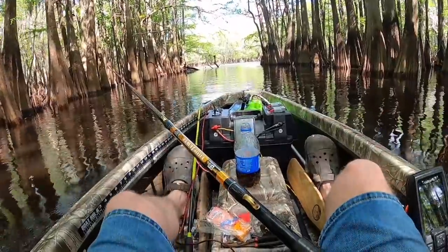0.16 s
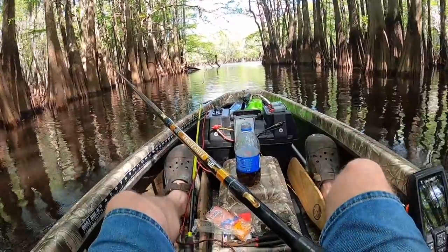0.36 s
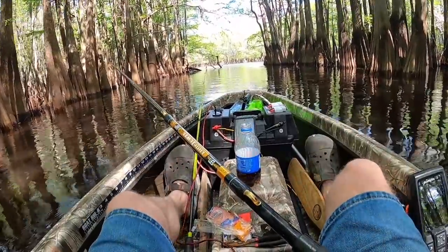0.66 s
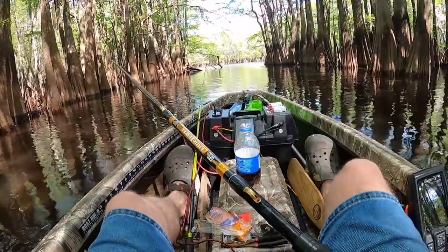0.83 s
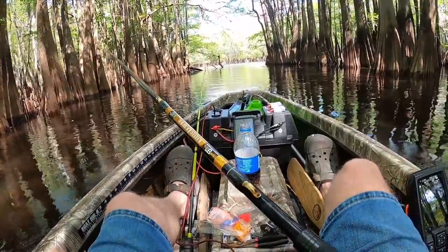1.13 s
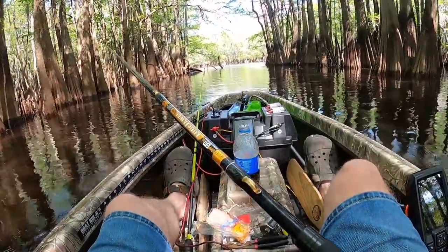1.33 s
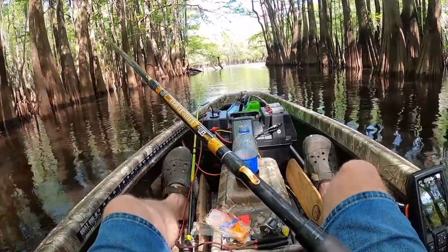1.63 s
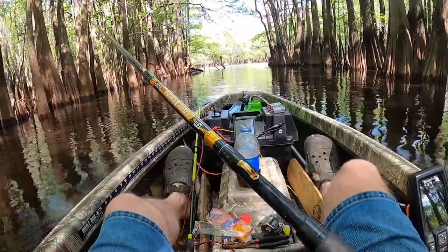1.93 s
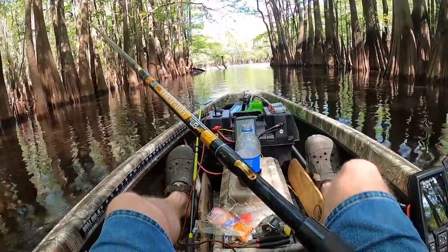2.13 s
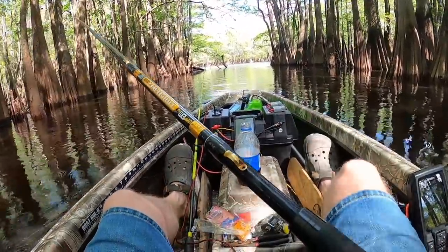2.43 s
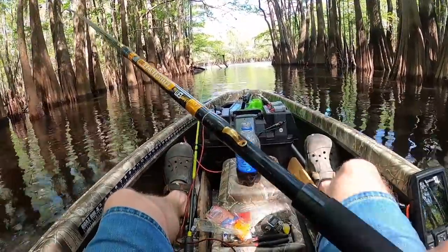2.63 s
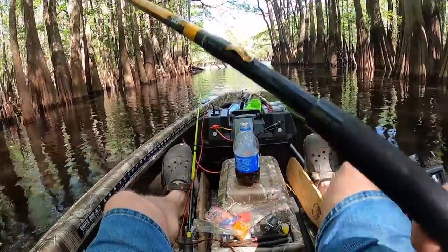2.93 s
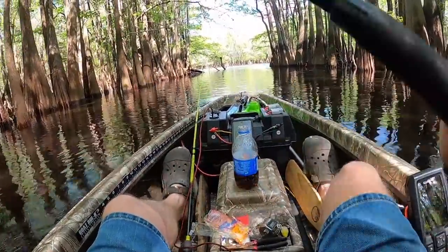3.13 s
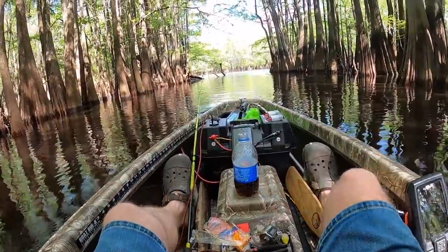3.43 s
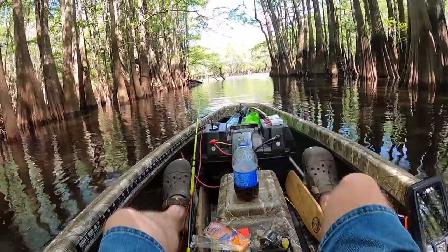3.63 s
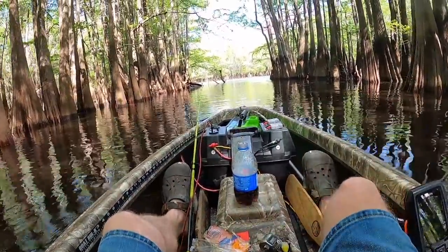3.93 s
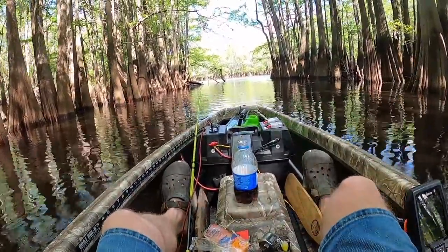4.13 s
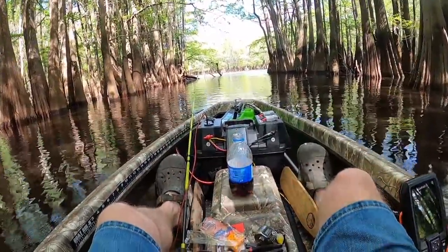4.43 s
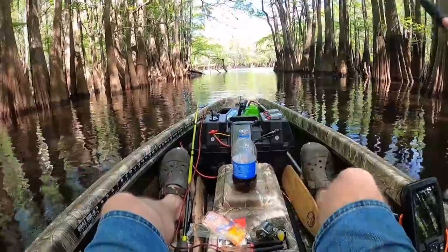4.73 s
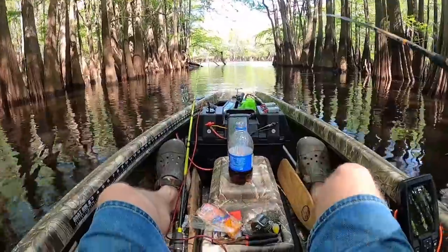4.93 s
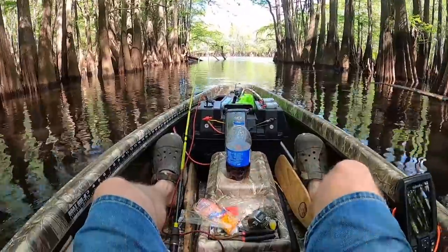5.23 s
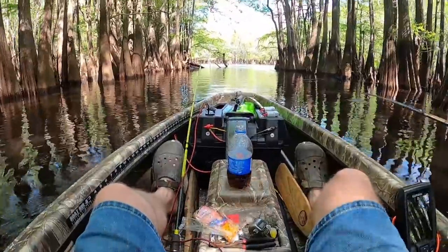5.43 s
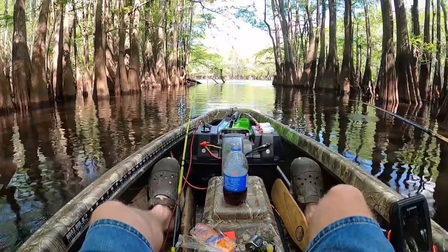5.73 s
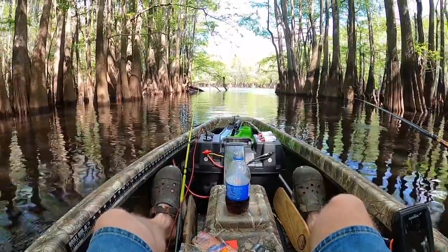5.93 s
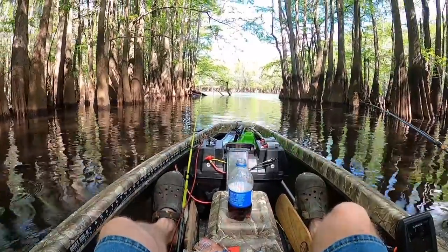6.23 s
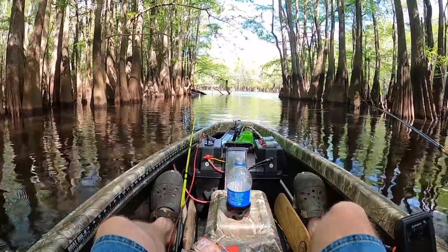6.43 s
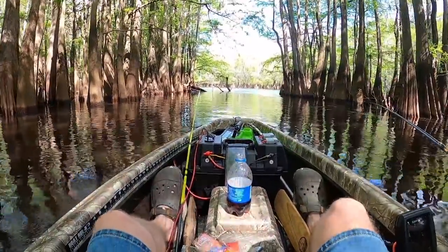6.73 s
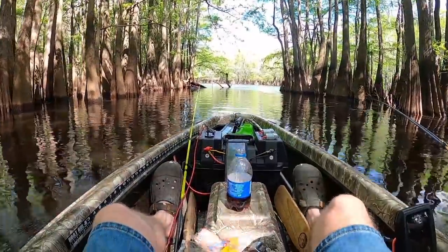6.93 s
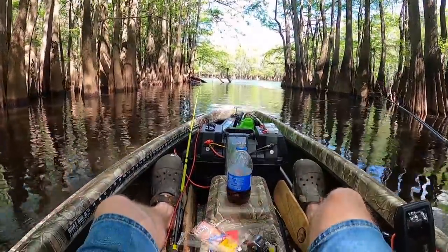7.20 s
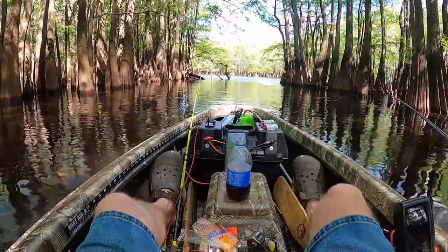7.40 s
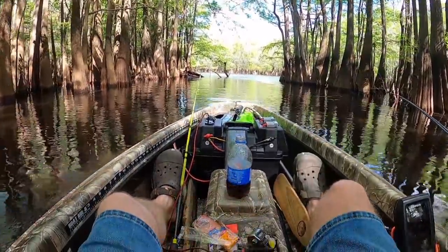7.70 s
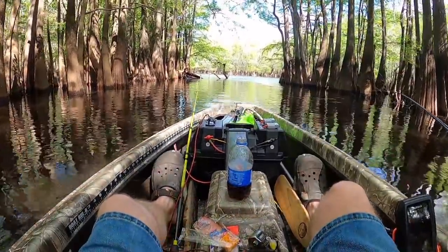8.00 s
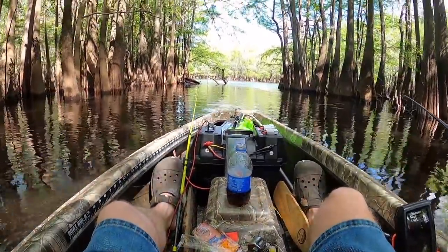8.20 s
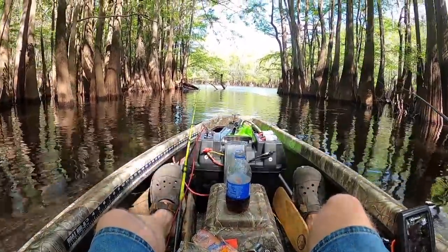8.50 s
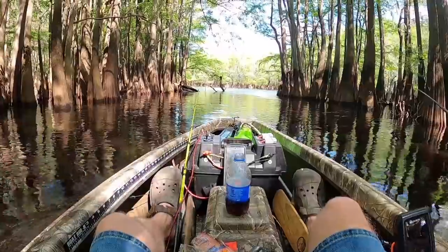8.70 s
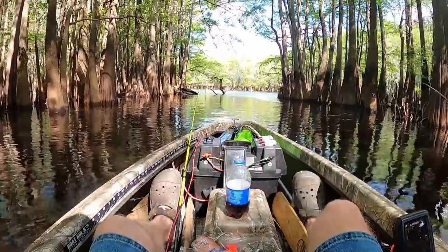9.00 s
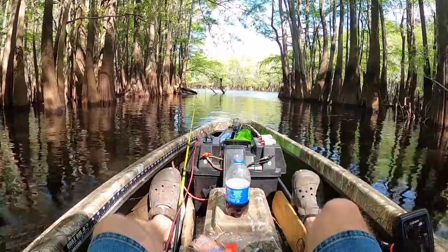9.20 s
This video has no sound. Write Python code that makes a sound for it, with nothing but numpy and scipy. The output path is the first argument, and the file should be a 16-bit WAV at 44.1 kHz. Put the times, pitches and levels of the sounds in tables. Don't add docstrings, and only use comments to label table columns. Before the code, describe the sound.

Aboard a small boat among flooded trees, a low uneven motor hum and soft wind buffeting run throughout. Hull thumps and a dry creak open, then rod scrapes, a sharp clip snap and knocks fill the first three seconds. A near bird gives bright chips in twos and threes about once a second. Far birds whistle, sweep and trill with woody echoes; another knock lands at seven seconds. Close stereo microphone on the boat.

```python
import sys
import numpy as np
from scipy import signal
from scipy.fft import rfft, irfft, next_fast_len
from scipy.io import wavfile
from scipy.ndimage import uniform_filter1d

SR = 44100
rng = np.random.default_rng(int(sys.argv[2]) if len(sys.argv) > 2 else 0)


def magnitude_from_level(level_db):
    exponent = np.asarray(level_db, float) / 20
    return 10 ** exponent


def put_to_file(sound):
    columns = np.atleast_2d(sound).T
    safe = np.clip(columns, -1, 1)
    whole_steps = np.round(safe * 32767)
    wavfile.write(sys.argv[1], SR, whole_steps.astype(np.int16))


N = 412335
T = np.arange(N) / SR

# time_s, shake_db, load (0 to 1)
MOTOR_COURSE = [(.13, -42, 0.18), (.6, -42.5, .2), (1.05, -43, 0.), (1.7, -54, 0.5), (2.3, -44.5, 0.68),
                (3.31, -36.5, 0.63), (3.7, -40.5, 0.86), (4.25, -39, 0.87), (4.5, -46, 0.96),
                (5.6, -38.5, 0.85), (6.3, -47, 0.67), (6.6, -53.5, .4), (7.1, -45.5, 0.44), (7.45, -50, .3),
                (7.66, -43, 0.15), (8.5, -48, 0.26), (9.05, -40, .95), (9.35, -38.5, 0.87)]
# time_s, effort_db, brightness_db
RUB_COURSE = [(0.1, -65.5, -7), (0.55, -71.5, -9.5), (1.3, -65, -13), (2.05, -68, -12.5), (2.65, -65, -6.5),
              (3.25, -72, -10.5), (4.3, -73.5, -9), (5.05, -69, -2), (5.4, -72.5, -5.5), (5.75, -66, -12),
              (6.4, -65.5, -13.5), (6.6, -74, -10), (6.72, -62.5, -17), (7.05, -60.5, -14),
              (7.3, -71.5, -8.5), (8.35, -73, -11), (8.68, -63, -15), (8.8, -70.5, -10)]
# pitch_hz, level_db
COARSE_COLOUR = [(400, 3), (700, -1), (1300, 2.5), (1500, -0.5), (1800, -2), (2400, -6), (3200, -21)]
MIDDLE_COLOUR = [(2000, -7.5), (2800, 2), (4000, -1.5), (5500, -2.5), (7500, -16.5)]
FINE_COLOUR = [(5000, -2.5), (7000, -2.5), (9500, -4.5), (11000, -18), (13000, -13.5), (15500, -30)]
# time_s, pitch_ratio (to the event's pitch), level_db
THIN_NOTE = [(0, 1.01, -14), (.005, 1.004, 0), (.017, 1, -2), (.026, .997, -25)]


def rms1(x):
    return x / np.sqrt(np.mean(x ** 2))


def colour(x, shape):
    hz, db = np.transpose(shape)
    size = x.shape[-1]
    f = np.maximum(np.arange(size // 2 + 1) * SR / size, 1)
    gain_db = np.interp(np.log(f), np.log(hz), db, left=-120, right=-120)
    return irfft(rfft(x) * magnitude_from_level(gain_db), size)


def hiss(shape, alike):
    noise = rng.standard_normal((2, next_fast_len(N, real=True)))
    mid, side = colour(noise, shape)[:, :N]
    alike = np.clip(alike, 0, 1)
    opposite = np.array([[1], [-1]])
    return rms1(np.sqrt(1 + alike) * mid + np.sqrt(1 - alike) * side * opposite)


def walk(rate):
    k = int(SR / rate)
    steps = np.repeat(rng.standard_normal(N // k + 1), k)[:N]
    return rms1(uniform_filter1d(steps, k))


def curve(table):
    s, *cols = np.transpose(table)
    return [np.interp(T, s, c) for c in cols]


def add(bus, s, x):
    i = max(int(s * SR), 0)
    bus[..., i:i + x.shape[-1]] += x[..., :bus.shape[-1] - i]


def sides(pan_db):
    return magnitude_from_level(np.array([[pan_db], [-pan_db]]) / 2)


def ring(x, hz, width):
    peak = signal.iirpeak(hz, hz / width, fs=SR)
    once = signal.lfilter(*peak, x)
    return rms1(signal.lfilter(*peak, once))


def note(shape, ratio=1., octave_db=-61.0):
    s, hz, db = np.transpose(shape)
    t = np.arange(s[0], s[-1], 1 / SR)
    pitch = np.interp(t, s, hz * ratio)
    phase = 2 * np.pi * np.cumsum(uniform_filter1d(pitch, size=60)) / SR
    opens = np.clip((5300 - pitch) / 250, 0, 1) * np.interp(t, s, magnitude_from_level(db - db.max()))
    overtones = magnitude_from_level(octave_db) * opens * (np.sin(2 * phase) + 0.25 * np.sin(3 * phase))
    return np.interp(t, s, magnitude_from_level(db)) * (np.sin(phase) + overtones)


def trunks(x, t60, alike=.6):
    t = np.arange(SR // 2) / SR
    n = rng.standard_normal((3, SR // 2))
    fade = np.exp(-np.log(1000) * t / t60) * np.minimum(t / 0.0045, 1)
    tail = (alike * n[0] + (1 - alike) * n[1:]) * fade
    tail = tail / np.sqrt(np.sum(tail ** 2) / 2)
    return signal.oaconvolve(x[None], tail, axes=1)[:, :N]


def afar(bus, wet_db, t60, pan_db, flutter_db, shimmer_db=0.):
    air = walk(70)
    voice = bus * magnitude_from_level(flutter_db * air)
    tail = magnitude_from_level(wet_db + shimmer_db * air[::-1]) * trunks(voice, t60)
    return (voice + tail) * sides(pan_db)


def song(events, shape, wet_db, t60, pan_db, flutter_db=6.0):
    bus = np.zeros(N)
    for s, *hz, db in events:
        add(bus, s, magnitude_from_level(db) * note(shape, hz[0] if hz else 1.))
    return afar(bus, wet_db, t60, pan_db, flutter_db)


def mode(hz, width):
    wander = np.cumsum(rng.standard_normal(N)) * np.sqrt(2 * np.pi * width / SR)
    phase = 2 * np.pi * hz * T + uniform_filter1d(wander, size=1500)
    return np.sqrt(2) * magnitude_from_level(2.3 * walk(6)) * np.sin(phase)


def hum():
    # pitch_hz, width_hz, unloaded_db, gained_under_load_db
    hull_modes = [(53.05, 3.1, 0, -9), (73.05, 4.25, -4, 1), (106.9, 9.98, -14.5, 8)]
    # pitch_hz, width_hz, relative_db
    hull_overtones = [(148, 11, -11.5), (197.6, 7.6, -12), (234.5, 5.02, -7)]
    shake_db, load = curve(MOTOR_COURSE)
    gains = [magnitude_from_level(shake_db + db + load_db * load) for _, _, db, load_db in hull_modes]
    out = sum(g * mode(hz, w) for g, (hz, w, *_) in zip(gains, hull_modes))
    out = out + gains[2] * sum(magnitude_from_level(db) * mode(hz, w) for hz, w, db in hull_overtones)
    return magnitude_from_level(-1.0) * np.array([np.roll(out, shift=45), out]) * sides(1.3)


def wind():
    # peak_s, peak_db, fall_s (time to fall 20 dB)
    gusts = [(.2, -37, 0.24), (1.1, -52, 0.2), (2.95, -39, 0.72), (5.3, -40, 0.3), (6.01, -37, 0.15),
             (6.33, -49.5, 0.56), (6.9, -46, 0.4), (7.8, -36, 0.38), (8.31, -54, 0.1), (9.2, -45, .5)]
    # pitch_hz, level_db (per Hz)
    buffet_colour = [(10, -10), (25, -3.5), (40, 4.5), (60, -8.5), (100, -15), (160, -24)]
    # pitch_hz, level_db
    rumble_colour = [(40, -10.5), (90, 0.5), (150, -2), (250, -11), (400, -21), (700, -34.5), (1200, -40)]
    gust_level = sum(magnitude_from_level(db - 20 * np.abs(T - s) / fall) for s, db, fall in gusts)
    effort_db, load = curve(RUB_COURSE)[0], curve(MOTOR_COURSE)[1]
    rumble_level = magnitude_from_level(-59.5 + 7 * load + .45 * (effort_db - effort_db.min()))
    buffet = magnitude_from_level(2.5 + 1.5 * walk(7)) * gust_level * hiss(buffet_colour, 0.11)
    rumble = magnitude_from_level(2.5 + 2.32 * walk(14)) * rumble_level * hiss(rumble_colour, 1.0)
    return (buffet + rumble) * sides(1.4)


def forest():
    # pitch_hz, level_db (per Hz)
    forest_colour = [(180, -29), (300, -0.5), (500, -4.5), (862, -20), (1350, -18), (1930, -30.5),
                     (8810, -47), (15400, -46.5)]
    return magnitude_from_level(-65.5) * hiss(forest_colour, 0.72)


def insects():
    # pitch_hz, width_hz, throbs_per_s, level_db
    choirs = [(4662, 310, 49, -89), (2467, 300, 33, -84), (6340, 400, 43, -89.5)]
    out = np.zeros((2, N))
    for hz, width, rate, db in choirs:
        level = magnitude_from_level(db + 2.5 * walk(1.2) + 4.1 * walk(rate))
        out += level * ring(rng.standard_normal((2, N)), hz, width)
    return out


def rubbing():
    slips = np.repeat(np.minimum(rng.exponential(size=N // 64 + 1), 4.5), 64)[:N]
    grains = rms1(magnitude_from_level(2.2 * uniform_filter1d(slips, size=64) + 1.5 * walk(25)))
    effort_db, bright_db = curve(RUB_COURSE)
    levels = effort_db, effort_db + bright_db, effort_db - 11.5 + 0.76 * bright_db
    low, mid, top = (magnitude_from_level(db + 1.2 * walk(12)) for db in levels)
    coarse = magnitude_from_level(0.2) * low * hiss(COARSE_COLOUR, 0.45) * sides(3.0)
    middle = magnitude_from_level(4.0) * mid * hiss(MIDDLE_COLOUR, 0.39) * sides(4.7)
    fine = magnitude_from_level(9.0) * top * hiss(FINE_COLOUR, 1.0)
    return grains * (coarse + middle + fine)


def thumps():
    # time_s, peak_db, pitch_hz
    hull_blows = [(0.103, -25.5, 91), (0.163, -27, 180), (0.237, -20, 73), (0.291, -29, 91),
                  (2.8, -44, 103), (2.927, -34.5, 204), (5.602, -35, 94), (7.061, -31.5, 196),
                  (7.098, -28.5, 158), (8.818, -30, 151.5)]
    # time_s, peak_db, pitch_hz
    part_blows = [(0.004, -43.5, 399), (0.024, -49.5, 393), (1.199, -44, 300), (1.258, -44.5, 356),
                  (7.059, -41, 300), (7.072, -40, 342)]
    bus = np.zeros((2, N))
    t = np.arange(SR // 3) / SR
    fade = np.minimum(t / 0.00207, 1) * np.exp(-np.log(1000) * t / 0.1)
    for s, db, hz in hull_blows + part_blows:
        add(bus, s, magnitude_from_level(db) * np.sin(2 * np.pi * hz * t) * fade * sides(.8))
    return bus


def knocks():
    # time_s, peak_db, ring_hz, brightness_db
    dull_blows = [(0.16, -41, 1104, -27), (1.01, -54, 1210, -26), (1.346, -48, 1270, -15),
                  (1.408, -50, 1170, -26), (1.586, -42.5, 1280, -8), (1.919, -44, 1266, -23),
                  (2.294, -33.5, 965, -23.5), (2.337, -45, 1000, -11), (2.406, -41, 1740, -10),
                  (2.925, -39.5, 1690, -21), (3.509, -54.5, 1295, -16), (4.258, -57.5, 815, -19),
                  (5.152, -40.5, 1033, -17.5), (5.602, -44.5, 876, -23), (6.337, -47.5, 1310, -14),
                  (7.001, -42, 1737, -22), (7.043, -30.5, 1686, -13.5), (7.052, -35, 1720, -9),
                  (7.067, -37, 1150, -32), (7.494, -56.5, 1410, -18), (8.503, -47.5, 1283, -37),
                  (8.723, -38, 944, -29), (8.907, -56.5, 1320, -17)]
    # time_s, peak_db, ring_hz, brightness_db
    crisp_blows = [(0.341, -47, 1310, -10), (1.1028, -28.5, 1600, -6.5), (1.382, -39, 1276, -12),
                   (1.443, -56.5, 1680, -8), (1.643, -56, 1430, -9), (2.994, -46.5, 2000, -11),
                   (3.831, -45.5, 1114, -21), (4.866, -50, 824, -20.5), (5.898, -48.5, 1080, -4),
                   (6.838, -52.5, 1660, -10), (8.238, -54, 990, -14), (9.2185, -45, 970, -9),
                   (9.288, -62, 1020, -3), (9.3465, -39, 1285, -20)]
    bus = np.zeros((4, N))
    t = np.arange(SR // 8) / SR
    rough = magnitude_from_level(2 * walk(300))
    blows = [(*k, -15.5, 0.056) for k in dull_blows] + [(*k, -4.5, .036) for k in crisp_blows]
    for (s, db, hz, mid_db, treble_db, decay), v in zip(blows, rng.random((len(blows), 2))):
        top_db = mid_db + treble_db
        t60 = decay * magnitude_from_level(-0.28 * (db + 46) - 0.1344 * (mid_db + 15))
        u = t / np.clip(t60, .01, .3)
        crack = np.minimum(t / 0.003, 1) * np.exp(-(u / 0.19) ** 0.79)
        fade = np.minimum(t / 0.002, 1) * np.exp(-np.log(1000) * u)
        partner = np.sin(2 * np.pi * (hz * (1.1 + 0.45 * v[0]) * t + v[1]))
        tone = np.sin(2 * np.pi * hz * t) + 0.18 * partner
        parts = np.array([0.62 * fade * tone, 0.57 * crack, magnitude_from_level(mid_db) * crack, magnitude_from_level(top_db) * crack])
        add(bus, s - .001, magnitude_from_level(db) * parts)
    dry_blows = bus[0] * rough + bus[1] * hiss(COARSE_COLOUR, 0.75)
    dry_blows = dry_blows + 1.47 * bus[2] * hiss(MIDDLE_COLOUR, 0.66)
    dry_blows = dry_blows + 2.05 * bus[3] * hiss(FINE_COLOUR, 0.91)
    return (dry_blows + magnitude_from_level(-14.5) * trunks(dry_blows.mean(0), t60=0.14)) * sides(2.7)


def drags():
    # start_s, end_s, level_db, upper_panels_relative_db, swish_relative_db
    strokes = [(0.16, 0.392, -68, -19, -20), (.93, 1.07, -68, -15, -20), (1.06, 1.2, -61, -8, -10),
               (1.32, 1.427, -72, -12, -20), (1.6, 1.72, -62, -9, -12), (1.7, 1.865, -59, -5, -12),
               (1.84, 1.965, -60, -10, -14), (2.615, 3.019, -72, -18, 3), (5.67, 6.48, -68, -19, -20),
               (6.696, 7.0, -71.5, -8, -12), (8.44, 8.77, -64.5, -17, -15), (8.98, 9.075, -63, -20, -15)]
    # pitch_hz, width_hz, level_db
    panels = [(1290, 150, 2), (1740, 200, 2), (1990, 560, 3.5)]
    upper_panels = [(2720, 350, -1), (3630, 350, -1), (4080, 260, 2), (4600, 800, 0)]
    swish = [(2700, 500, 0), (5000, 1000, -1)]
    slips = rng.standard_normal(N) * magnitude_from_level(2.5 * walk(60))
    layers = []
    for modes in (panels, upper_panels, swish):
        layers.append(rms1(sum(magnitude_from_level(db) * ring(slips, hz, w) for hz, w, db in modes)))
    gates = np.zeros((3, N))
    for a, b, db, *rel_db in strokes:
        gate = np.clip(np.minimum((T - a) / 0.067, (b - T) / 0.04), 0, 1)
        gates += gate * magnitude_from_level(db + np.array([0, *rel_db]))[:, None]
    return (gates * np.array(layers)).sum(0) * sides(6.9)


def tackle():
    # time_s, peak_db, pitch_hz, width_hz
    pricks = [(.1615, -47, 1800, 2000), (2.295, -43, 1650, 300), (.2054, -54, 5000, 4000),
              (1.495, -61, 6950, 500), (1.567, -59, 6000, 1500), (2.113, -56, 5000, 5000),
              (2.56, -54, 1200, 300), (2.682, -54, 6200, 800), (2.78, -57, 1050, 300),
              (2.823, -53, 1150, 300), (2.865, -53, 1100, 300), (2.885, -54, 1150, 300),
              (.587, -62, 9000, 5000), (1.1025, -58, 12500, 4000), (5.187, -58, 3700, 900),
              (5.196, -52, 3500, 3000), (9.153, -58, 8000, 4000), (9.278, -58, 8000, 4000),
              (9.327, -57, 7000, 4000)]
    snaps = [
        (1.102, -40),
        (1.1065, -46),
        (1.1103, -40),
    ]
    clip_modes = [(1593, -10, .04), (2200, -3, .045), (2988, -6, .05), (4554, -12, .04), (6342, -2, .03),
                  (6783, -12, .04), (7682, -7, .035), (9070, -16, .03)]
    bus = np.zeros(N)
    t = np.arange(SR // 16) / SR
    for (s, db, hz, width), n in zip(pricks, rng.standard_normal((len(pricks), len(t)))):
        fade = np.minimum(t / .0006, 1) * np.exp(-t / (.0012 + 1.5 / width))
        add(bus, s, magnitude_from_level(db) * ring(n, hz, width) * fade)
    for s, db in snaps:
        phases = 2 * np.pi * rng.random(len(clip_modes))
        tones = np.zeros(len(t))
        for (hz, g, t60), p in zip(clip_modes, phases):
            tones += magnitude_from_level(g) * np.sin(2 * np.pi * hz * t + p) * np.exp(-np.log(1000) * t / t60)
        add(bus, s, magnitude_from_level(db) * np.minimum(t / .0005, 1) * tones)
    return bus * sides(2.5)


def squeaks():
    # time_s, pitch_hz, level_db
    creaks = [(.168, 1480, -63), (.174, 1100, -59), (.21, 1750, -57), (.222, 1900, -63), (.228, 1330, -64),
              (.236, 1700, -65), (.249, 2040, -54), (.254, 1100, -65), (.256, 2650, -68), (.305, 760, -64),
              (.36, 1773, -67), (.385, 1800, -72)]
    return song(creaks, THIN_NOTE, -6.0, 0.085, 1.5, flutter_db=3.0)


def chipper():
    # time_s, first_lobe_db, first_null_s, second_lobe_relative_db, third_lobe_relative_db
    chips = [(0.347, -41, .0068, 0, -1), (0.394, -39, .0068, 0, 0), (1.4938, -45, .0052, 4, 2),
             (1.5382, -42, .004, 4, -6), (1.5925, -47, .0036, 9, -2), (2.9326, -40, .0113, -5, -7),
             (2.9787, -40, .0128, -1, -8), (3.791, -39, .0065, 0, -1), (3.8392, -39, .0065, 2, 0),
             (4.8087, -37, .0065, -3, -3), (4.8515, -37, .0068, -1, -2), (5.8192, -39, .0095, -4, -7),
             (5.862, -41, .0095, -1, -5), (6.7474, -39, .011, -2, -5), (6.795, -40, .011, 0, -2),
             (7.739, -41, .011, -3, -8), (7.785, -40, .011, -2, -6), (7.8376, -43, .012, 2, -4),
             (8.9805, -42, .0103, 2, -5), (9.0268, -43, .0103, 4, -3)]
    # time_s, pitch_hz
    chip_pitch = [(-.004, 6200), (-.001, 5600), (.002, 5240), (.007, 5110), (.0105, 5050), (.0158, 4840),
                  (.019, 4780), (.028, 4880)]
    bus = np.zeros((2, N))
    for (s, db, null, second, third), vary in zip(chips, rng.standard_normal((len(chips), 12))):
        late = max(.0132, null + .0046)
        times = [-.004, -.0012, 0, .002, (.002 + 2 * null) / 3, null,
                 late - .0025, late, late + .002, late + .005, .024, .028]
        null_db = -np.clip(8000 * (null - .0035), 2, 26)
        lobes = np.array([-30, -14, -22, 0, -4, null_db,
                          second, third - 16, third, third - 20, -10 + vary[0], -32])
        hz = np.interp(times, *np.transpose(chip_pitch)) * (1 + .004 * vary)
        chip = note(np.transpose([times, hz, lobes]), octave_db=-23.0) * magnitude_from_level(db + 1.5)
        add(bus, s + times[0], chip * sides(-0.3 - 0.3 * s))
    bus = np.array([np.roll(bus[0], shift=1), bus[1]])
    return bus + magnitude_from_level(-18.5) * trunks(bus.mean(0), t60=0.14, alike=.4)


def accented(events, shape, echo_db):
    bus = np.zeros(N)
    for s, db, start_db, drop_db in events:
        accent = np.array(shape)
        accent[:2, 2] += start_db
        accent[-3:, 2] += drop_db
        add(bus, s, magnitude_from_level(db) * note(accent))
        add(bus, s + .082, magnitude_from_level(db + echo_db) * note(accent))
    return bus


def whistler():
    # time_s, level_db, start_relative_db, final_drop_relative_db
    slur_times = [
        (.419, -62, 0, -8),
        (4.048, -72, -5, 4),
        (7.931, -72, -2, 2),
    ]
    whistle_times = [(.627, -60.5, 1, -4), (.889, -60, -1, -5), (1.15, -75, 0, -8), (4.262, -63, -14, 3),
                     (4.505, -62, -8, -1), (4.77, -76, 0, -5), (8.137, -63, -3, -5), (8.402, -58.5, 1, -8),
                     (8.66, -76, 0, -8), (9.04, -74, 0, -12)]
    # time_s, pitch_hz, level_db
    slur_shape = [(0, 2790, -16), (.012, 2770, -3), (.026, 2740, 0), (.04, 2620, 0), (.054, 2480, -3),
                  (.066, 2400, -30)]
    whistle_shape = [(0, 2740, -14), (.02, 2755, -2), (.06, 2810, -2), (.088, 2820, -7), (.108, 2775, 0),
                     (.116, 2680, 0), (.124, 2500, -3), (.135, 2400, -30)]
    whistles = accented(whistle_times, whistle_shape, echo_db=-8.0)
    slurs = accented(slur_times, slur_shape, echo_db=-10.0)
    return (afar(whistles, -1.5, 1.05, 3.1, flutter_db=2.2, shimmer_db=3.0)
            + afar(slurs, 1.2, 0.9, 3., flutter_db=2.5, shimmer_db=4.0))


def thin_caller():
    # time_s, pitch_hz, level_db
    calls = [(.92, 7600, -75), (1.085, 6950, -70), (1.3, 6900, -74), (3.95, 7670, -71), (4.657, 7000, -63),
             (4.686, 7700, -72)]
    return song(calls, THIN_NOTE, -5.0, 0.37, .6)


def sweeper():
    # time_s, pitch_hz, level_db
    fall_times = [(4.278, 5020, -66.5), (4.53, 5170, -61), (4.768, 5120, -65), (4.997, 5290, -64.5),
                  (5.232, 5150, -64.5), (5.464, 5270, -62)]
    # time_s, pitch_ratio, level_db
    rise_times = [(4.403, .99, -65), (4.664, 1.005, -64), (4.908, .96, -65), (4.94, 1.01, -67),
                  (5.14, 1.01, -65), (5.375, 1.01, -60.5), (5.62, 1.01, -69)]
    # time_s, pitch_ratio, level_db
    fall_shape = [(0, 1.19, -18), (.016, 1.18, -6), (.035, 1.105, -3), (.05, .97, 0), (.063, .78, -12),
                  (.076, .72, -40), (.09, .78, -13), (.116, 1.0, -5), (.128, 1.03, -30)]
    # time_s, pitch_hz, level_db
    rise_shape = [(0, 7300, -14), (.008, 6880, 0), (.015, 7050, -2), (.022, 7600, -4), (.032, 7950, -8),
                  (.042, 8050, -25)]
    swoop_shape = [(0, 4850, -10), (.012, 4750, 0), (.028, 4300, -2), (.042, 3900, -14)]
    falls = song(fall_times, fall_shape, 5.5, 0.83, 7.4, flutter_db=3.0)
    rises = song(rise_times, rise_shape, 1.2, 0.39, 2.5, flutter_db=3.0)
    swoop = song([(4.738, -63.5)], swoop_shape, 2.5, .5, 4.0, flutter_db=3.0)
    return falls + rises + swoop


def triller():
    # time_s, centre_hz, level_db
    trill_course = [(6.07, 5600, -69), (6.25, 5600, -65), (6.42, 5600, -59), (6.6, 6250, -55),
                    (6.75, 6200, -56), (6.85, 5800, -59), (6.93, 5650, -54)]
    # time_s, pitch_ratio, level_db
    arches = [
        (6.934, 0.98, -50),
        (6.972, 1.0, -47),
        (7.026, 1.14, -55),
    ]
    # time_s, pitch_hz, level_db
    arch_shape = [(0, 4300, -16), (.005, 4800, -5), (.01, 5150, 0), (.018, 4850, -3), (.028, 4050, -9),
                  (.031, 3950, -30)]
    # time_s, pitch_hz, level_db
    level_notes = [
        (6.93, 4150, -61),
        (7.002, 4880, -43),
        (7.028, 4850, -46),
    ]
    s, hz, db = np.transpose(trill_course)
    times = np.arange(6.072, s[-1], 1 / 28.5)
    vary = rng.standard_normal((60, 3))[:len(times)].T
    hz = np.interp(times, s, hz) * (1 + 0.016 * vary[0])
    db = np.interp(times, s, db) + 1.5 * vary[1] + 1.8
    slide = [(0, 1.05, -14), (.002, 1.02, 0), (.005, .98, -2), (.009, .92, -16)]  # s, pitch ratio, dB
    main = [*zip(times + 0.0008 * vary[2], hz, db)]
    partners = [*zip(times + 0.0065, .86 * hz, db - 3.0 + 2.5 * vary[2])]
    return (song(main + partners, slide, 0.3, 0.44, 4.6, flutter_db=2.6)
            + song(arches, arch_shape, -2.5, 0.51, 8.2, flutter_db=3.0)
            + song(level_notes, THIN_NOTE, -2.5, 0.51, 8.2, flutter_db=3.0))


def diver():
    # time_s, pitch_hz, level_db
    dive_times = [
        (7.68, 7260, -73),
        (8.305, 7160, -77),
    ]
    # time_s, pitch_ratio, level_db
    dive_shape = [(0, 1.12, -14), (.008, 1.05, -3), (.022, 1, 0), (.04, .975, -20)]
    return song(dive_times, dive_shape, 1.5, 0.72, .6)


def climber():
    # time_s, pitch_hz, level_db
    climb_shape = [(0, 5500, -10), (.015, 5800, 0), (.035, 6500, 0), (.05, 7100, -12)]
    return song([(9.245, -73)], climb_shape, 0.5, .3, 2.5, flutter_db=4.0)


def scene():
    boat = hum() + rubbing() + thumps() + knocks() + drags() + tackle() + squeaks()
    air = wind() + forest() + insects()
    birds = chipper() + whistler() + thin_caller() + sweeper() + triller() + diver() + climber()
    return boat + air + birds


def low_pass(x):
    return signal.sosfilt(signal.butter(12, 15590, fs=SR, output="sos"), x)


def record(dry):
    left = 0.62 * dry[0] + 0.4 * np.roll(dry[0], shift=1)
    return low_pass(np.array([left, dry[1]]))


dry = scene()
out = record(dry)
put_to_file(out)
```